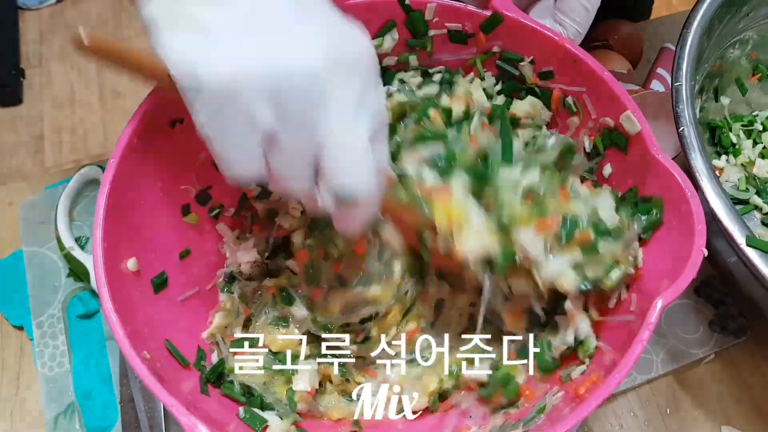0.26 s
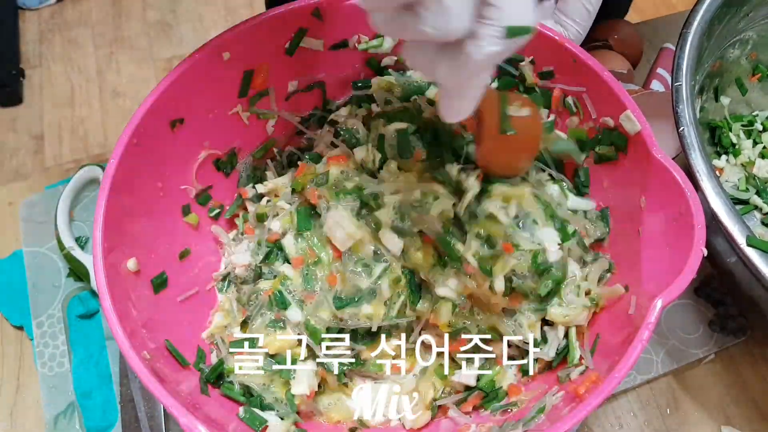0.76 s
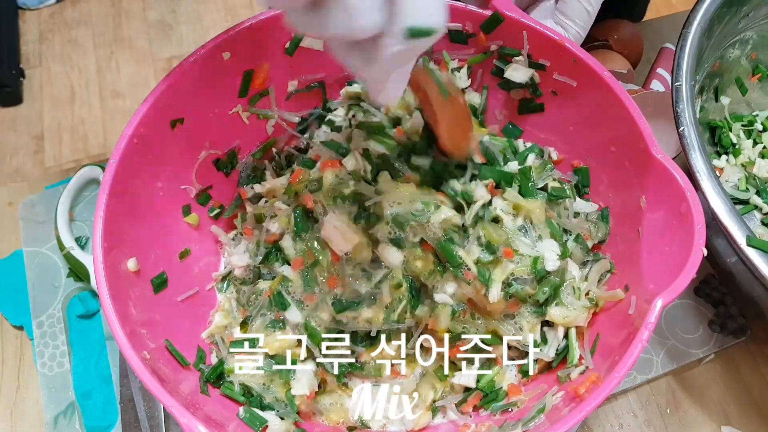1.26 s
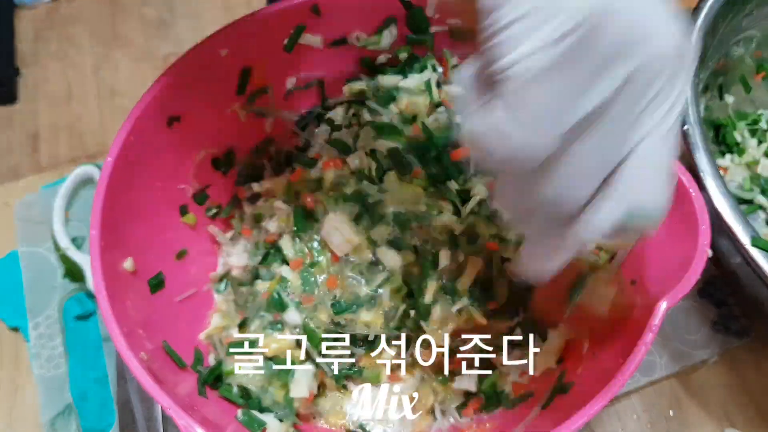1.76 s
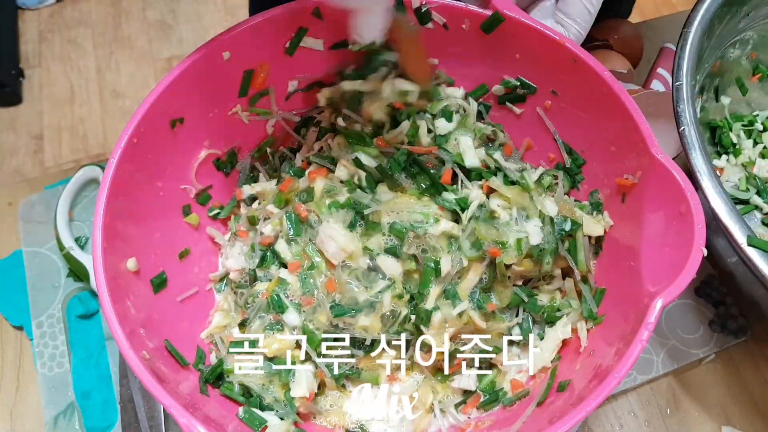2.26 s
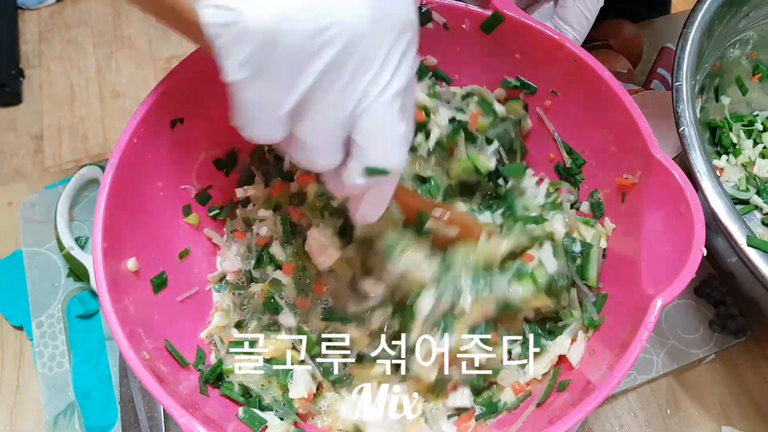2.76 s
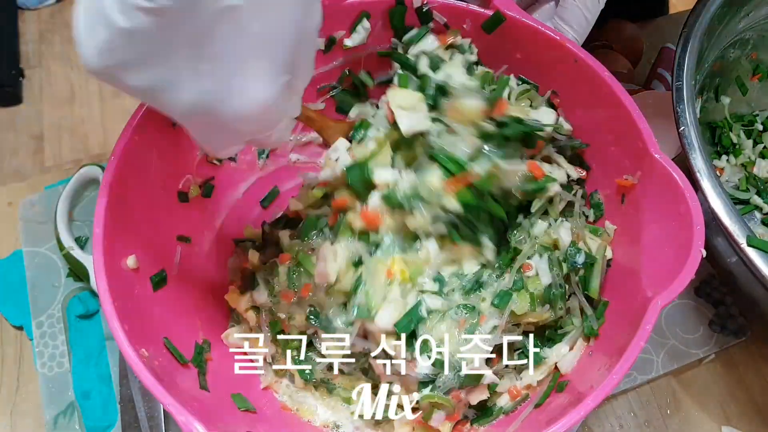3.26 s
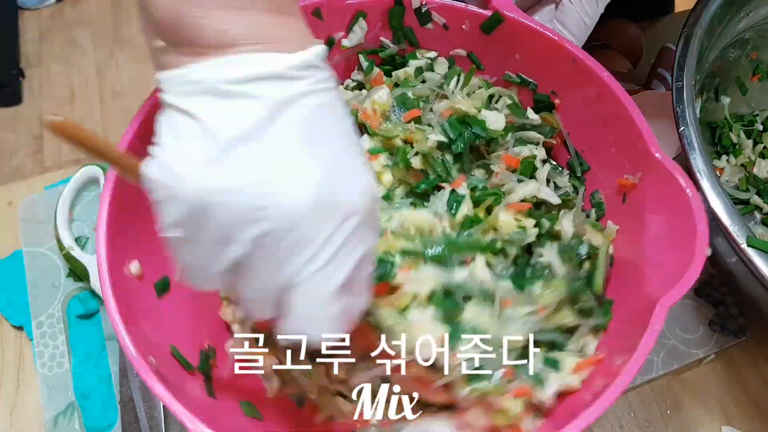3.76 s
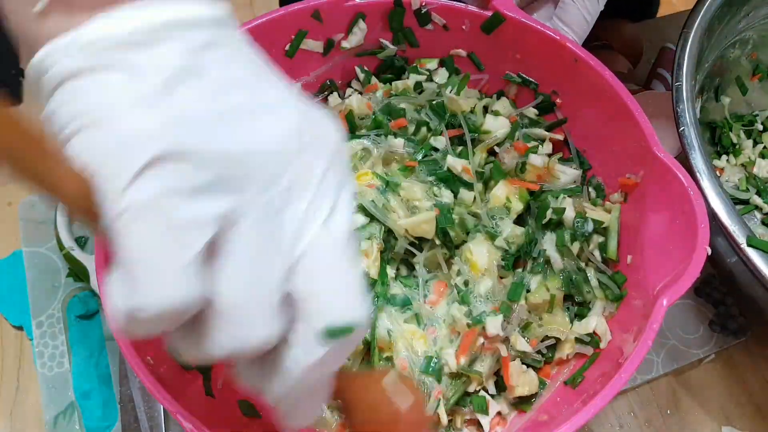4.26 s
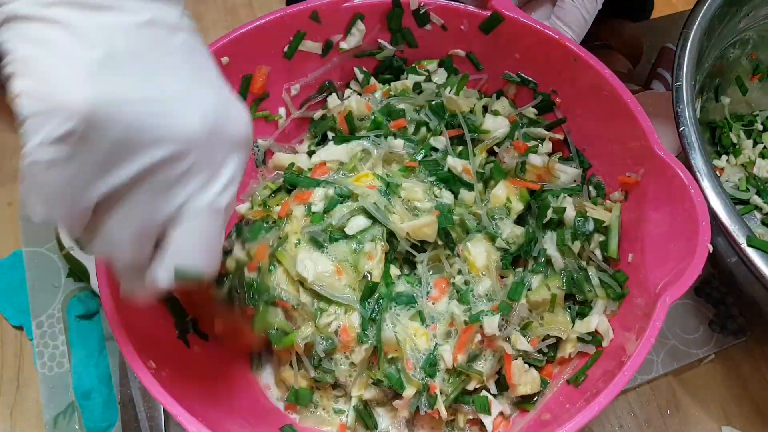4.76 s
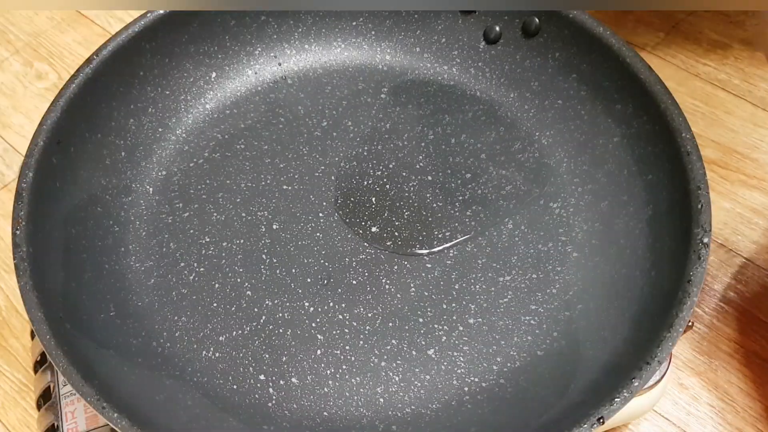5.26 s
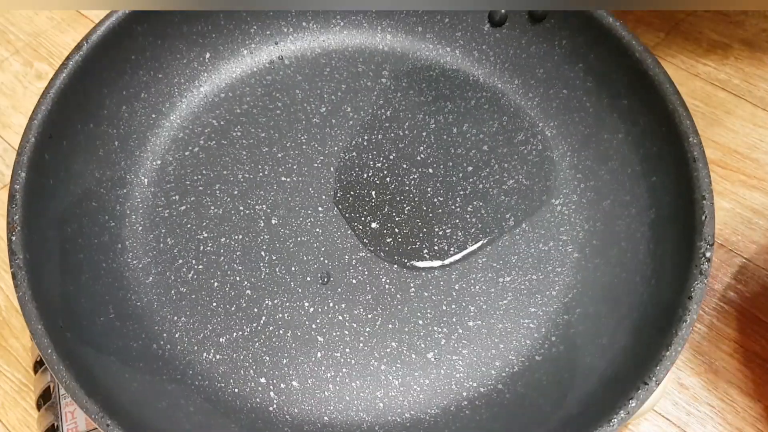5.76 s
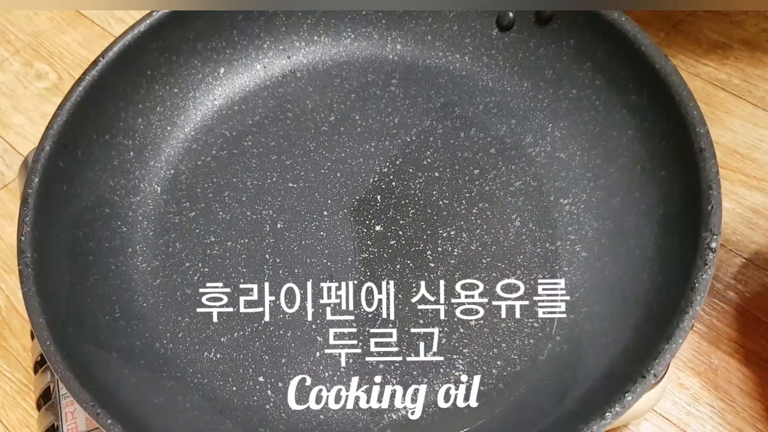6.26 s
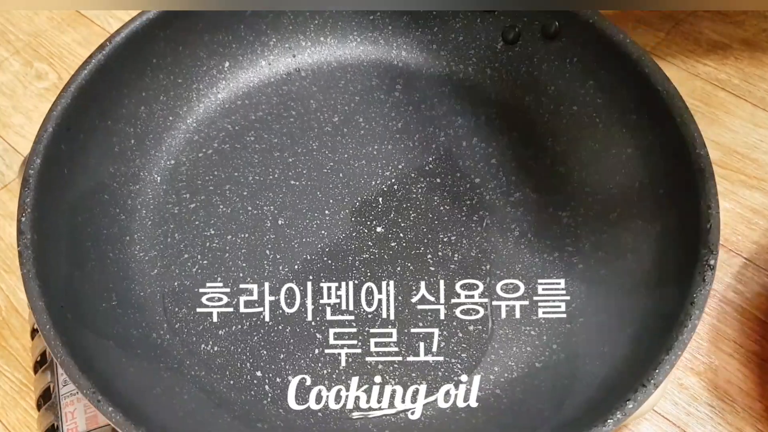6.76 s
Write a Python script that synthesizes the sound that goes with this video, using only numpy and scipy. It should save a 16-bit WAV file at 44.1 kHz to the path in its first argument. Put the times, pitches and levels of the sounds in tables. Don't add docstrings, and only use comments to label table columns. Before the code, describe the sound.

Irregular strokes of a spoon through sticky, chunky batter, with bubbles popping and dull plastic knocks on the bowl wall, heard by a close stereo microphone in a fairly dry room with low rumble. Then a sudden change of scene: steady low flame noise with thin gas hiss and faint jet whistles, and a metal pan shifting with light taps, then a cluster of sharper clanks.

```python
import sys
import numpy as np
from scipy import signal
from scipy.fft import rfft, irfft, next_fast_len
from scipy.io import wavfile
from scipy.ndimage import uniform_filter1d

SR = 44100
rng = np.random.default_rng(int(sys.argv[2]) if len(sys.argv) > 2 else 0)


def invert_db(level):
    return 10 ** (np.asarray(level, dtype=float) / 20)


def dump_mix(stems):
    frames = np.atleast_2d(stems).T
    limited = np.clip(frames, -1, 1)
    pcm = np.round(limited * 32767).astype(np.int16)
    wavfile.write(sys.argv[1], SR, pcm)


N = 309700


def evened(x):
    return x / np.sqrt(np.mean(x ** 2) + 1e-20)


def peaked(x):
    return x / abs(x).max()


def read(points, hz):
    f, value = np.transpose(points)
    return np.interp(np.log(hz + 1), np.log(f + 1), value)


def along(rows):
    s, *columns = np.transpose(rows)
    return [invert_db(np.interp(np.arange(N) / SR, s, c)) for c in columns]


def add(mix, s, sound):
    part = mix[..., round(s * SR):][..., :sound.shape[-1]]
    part += sound[..., :part.shape[-1]]


def band(x, lo_hz, hi_hz):
    return signal.sosfilt(signal.butter(2, [lo_hz, hi_hz], "band", fs=SR, output="sos"), x)


def coloured(x, spectrum):
    size = next_fast_len(N)
    gain = invert_db(read(spectrum, np.fft.rfftfreq(size, 1 / SR)))
    return evened(irfft(rfft(x, size) * gain, size)[..., :N])


# [f/Hz, likeness]
LIKENESS = [(60, 0.95), (180, 0.96), (550, 0.73), (1650, 0.027), (4970, 0.03), (15000, 0.057)]


def pair_noise(patchy_db):
    frames, hz = N // 128 + 5, np.fft.rfftfreq(512, 1 / SR)
    a, b, c, d, patches = rng.standard_normal((frames, 257, 5)).T
    patches = evened(uniform_filter1d(uniform_filter1d(patches, 6, 0), 16, 1))
    same = np.clip(read(LIKENESS, hz), -1, 1)[:, None]
    left = a + 1j * b
    right = same * left + np.sqrt(1 - same ** 2) * (c + 1j * d)
    z = np.array([left, right]) * invert_db(patchy_db * patches)
    return signal.istft(z, nperseg=512, noverlap=384)[1][:, :N]


def flickering(depth_db, quick_s):
    jumps = evened(uniform_filter1d(rng.standard_normal(N), round(quick_s * SR)))
    return evened(pair_noise(1.0) * invert_db(depth_db * jumps))


def whistle(hz, width):
    peak = [(hz - 2 * width, -40), (hz - width / 2, -6), (hz, 0), (hz + width / 2, -6), (hz + 2 * width, -40)]
    return coloured(pair_noise(0), peak)


def grains(per_s, spread_db, lo_hz, hi_hz, cycles):
    size = invert_db(spread_db * np.minimum(rng.exponential(1, N), 5)) * (rng.random(N) < per_s / SR)
    kind, out = rng.integers(0, 16, N), np.zeros((2, N))
    for k, hz in enumerate(np.geomspace(lo_hz, hi_hz, num=16)):
        turns = np.arange(400) * hz / SR
        grain = np.sin(2 * np.pi * turns * (1 + 0.04 * turns)) * np.exp(-2 * turns / cycles) * np.sqrt(hz)
        side_db = 3 * (-1) ** k
        out += invert_db([[side_db], [-side_db]]) * signal.oaconvolve(size * (kind == k), grain)[:N]
    return evened(out)


def leaning(hz, middle_hz, db_per_octave):
    return invert_db(db_per_octave * np.log2(hz / middle_hz) * np.array([[.5], [-.5]]))


def burner_share():
    return np.clip((np.arange(N) / SR - CUT_S) / 0.004, 0, 1)


CUT_S = 4.93

STEEPNESS = (1.0, 1.07, 1.44)


def strokes(rows, rise_share):
    s, fade, *levels = np.transpose(rows)
    t = np.arange(0, N + 64, 64) / SR
    late = (t[:, None] - s) / np.maximum(fade, .01)
    down_db = -20 * np.maximum(late, -late / rise_share)
    powers = [(invert_db(db + steep * down_db) ** 2).sum(axis=1) for db, steep in zip(levels, STEEPNESS)]
    return np.array([np.interp(np.arange(N) / SR, t, power) for power in powers])


# [t/s, time to fade 20 dB/s, drag level/dB, wet crackle level/dB, finest spray level/dB]
SLOPS = [(0.0, 0.17, -49.5, -55.5, -78), (0.735, 1.02, -56.5, -60.5, -66), (0.98, 0.52, -51.5, -65, -60),
         (1.2, 0.06, -58.5, -41, -46), (1.51, 0.25, -49, -55, -55), (1.79, 0.56, -53, -63, -70),
         (2.035, 0.16, -53, -53.5, -76), (2.27, 0.24, -48.5, -60, -57), (3.035, 0.44, -55, -56, -54.5),
         (3.145, 0.4, -47.5, -75, -62.5), (3.765, .3, -63.5, -63, -86), (4.385, 0.14, -65, -57.5, -58.5),
         (4.61, 0.3, -71, -75, -59), (4.775, 0.13, -40.5, -42.5, -45)]
SWEEPS = [(0.228, 0.26, -44, -54, -63), (0.558, 1, -60.5, -69, -91), (0.885, -1.4, -67, -60, -80),
          (0.965, -0.52, -52, -46, -64), (1.09, -0.4, -67, -57, -68), (1.254, 0.04, -45, -47, -60),
          (1.6, 0.16, -54.5, -54, -65), (1.871, 0.1, -49.5, -72, -47), (1.922, 0.02, -61, -50, -57),
          (2.02, 0.04, -57, -54, -63), (2.141, -0.19, -55, -71, -52), (2.308, 0, -48, -49, -54),
          (2.612, 0.19, -52, -58, -85), (2.83, 0.27, -55.5, -60, -69), (3.09, 0.15, -54, -60, -70),
          (3.3, -1.8, -64.5, -80, -88), (3.57, 0.17, -52, -62, -73), (3.831, 0.39, -50, -62, -65.5),
          (3.887, 0.0056, -39.5, -72, -76), (4.05, 0.52, -56.5, -63.5, -72), (4.456, 0.06, -47, -49, -51),
          (4.67, 0.09, -49, -57, -50), (4.882, 0.1, -52, -54, -58)]
# [f/Hz, level/dB]
DRAG = [(180, -56.5), (300, -6), (492, -6), (708, -3.5), (1600, -7.5), (2330, -7), (5000, -25.5),
        (6500, -74.5)]
CRACKLE = [(1500, -35), (2600, 2.5), (3500, 1), (4700, -3.5), (6300, -4), (7700, -4), (8700, -15.5),
           (11000, -23)]
SPRAY = [(5000, -17.5), (8000, 14.5), (9300, -2), (11000, 8), (13000, 8.5), (15500, 9.5)]


def stirring():
    drag, crackle, spray = np.sqrt(strokes(SLOPS, 0.046) + strokes(SWEEPS, 0.47))
    dragging = coloured(.6 * grains(2000, 2.8, 600, 3500, 5.) + flickering(2.5, .012), DRAG)
    wet = 0.2 * grains(3000, 3.9, 2330, 13300, 1.9) + flickering(4.5, 0.0046)
    layers = drag * dragging + crackle * coloured(wet, CRACKLE) + spray * coloured(wet, SPRAY)
    return invert_db(-0.5) * layers * (1 - burner_share())


# [t/s, peak level/dB, pitch f/Hz, spray level/dB]
POPS = [(0.04, -34.5, 2160, -14), (0.215, -39.5, 2700, -7), (0.233, -33.5, 1240, -11),
        (0.234, -35.5, 3250, -12), (0.262, -39, 2280, -25), (0.263, -39, 1130, -30),
        (0.315, -35.5, 1264, -25), (0.331, -45, 2850, -20), (0.374, -43, 690, -27), (0.467, -51, 2000, -19),
        (0.507, -50, 3130, -18), (0.547, -44.5, 3150, -14), (1.069, -43, 2260, -5),
        (1.243, -42.5, 740, 4.5), (1.5154, -33.5, 2030, -13), (1.542, -35, 2160, -18),
        (1.566, -40, 965, -1.5), (1.603, -38, 2600, -5), (1.848, -41, 1040, -25), (1.902, -38, 1050, -25),
        (1.91, -39, 1730, -11), (2.048, -39, 2000, -20), (2.1075, -45, 1940, -13), (2.304, -33.5, 1040, -9),
        (3.153, -37, 2310, -5), (3.177, -32.5, 1840, -15), (3.22, -33.5, 1760, -16),
        (3.23, -33.5, 1800, -15), (3.358, -38, 833, -49), (3.763, -37, 2360, -22), (3.776, -43, 2500, -25),
        (3.792, -37, 1395, -25), (3.819, -35, 746, -12), (3.878, -32, 1910, -30), (3.884, -29, 1776, -31.5),
        (3.89, -38, 800, -30), (3.94, -42.5, 2400, -15), (3.978, -39.5, 1310, -17), (4.031, -42, 2240, -28),
        (4.049, -58, 659, 10), (4.082, -50, 2150, -23), (4.118, -52, 3000, -2), (4.158, -47, 1800, -15),
        (4.169, -39.5, 1730, -25), (4.442, -41, 920, -3), (4.457, -32, 2490, -14),
        (4.468, -36.5, 2170, -18), (4.631, -29, 1035, -14), (4.885, -49, 872, -4)]
MORE_POPS = [(0.84, -49, 1990, 0), (0.885, -54, 2000, 3), (1.564, -41, 2200, -15), (1.568, -40, 3100, -20),
             (1.579, -45, 2310, -30), (1.586, -43, 2300, -30), (1.6327, -43, 1190, -16), (1.649, -46, 3600, -11),
             (2.129, -46, 1500, -20), (2.314, -41, 3300, -10), (3.3, -46.5, 872, -25), (3.375, -48.5, 2800, -15),
             (3.393, -48, 1800, -25), (3.493, -41, 1080, -14), (3.558, -47, 766, -24.5), (3.578, -41, 985, -20),
             (3.695, -50, 2850, -8), (3.788, -54, 6500, -2)]


def pops():
    out, t = np.zeros((2, N)), np.arange(1600) / SR
    for s, db, hz, spray_db in POPS + MORE_POPS:
        noise = rng.standard_normal((3, len(t)))
        fade = np.minimum(t / 0.0011, 1) * (invert_db(-60 * t / 0.013) + invert_db(-13 - 60 * t / 0.13))
        ragged = evened(band(noise[0] + .6 * noise[1:], hz * .72, hz * 1.35))
        bubble = .7 * np.sin(2 * np.pi * hz * t) + .45 * ragged
        spray = evened(band(noise[1:], 2700, 16000))
        place = leaning(hz, 1100, 1.5)
        add(out, s, invert_db(db) * fade * (bubble + invert_db(spray_db) * spray) * place)
    return out


# [t/s, peak level/dB, low wall mode f/Hz, high wall mode f/Hz, high mode level/dB]
KNOCKS = [(0.711, -33, 810, 2290, -20), (0.7241, -28.5, 1370, 3200, -5), (0.7264, -25, 1056, 2150, -2.5),
          (0.7303, -33, 1060, 3220, -5), (0.729, -27.5, 1430, 1790, -2.5), (0.9758, -19.5, 947, 2330, -6.5),
          (0.9763, -26, 576, 1880, -2), (0.978, -23, 1150, 1530, -5), (0.984, -29, 846, 2050, -10),
          (1.1895, -11, 1005, 1544, -11), (1.1914, -10, 1008, 2310, -18), (1.19, -25, 302, 1350, 1),
          (1.198, -23.5, 850, 1700, -17), (1.508, -32.5, 780, 1600, -14), (1.786, -23, 876, 1720, -7),
          (1.794, -27, 940, 2100, -14.5), (1.864, -30, 914, 2010, -12), (1.931, -29, 1006, 1644, -3.5),
          (1.94, -40, 980, 2600, -1), (2.03, -25, 787, 1750, -7.5), (2.0305, -35.5, 1300, 2710, -3),
          (2.261, -10, 1100, 1557, -15), (2.263, -17, 946, 1920, -9), (2.2616, -24.5, 597, 3120, -5.5),
          (3.027, -14, 937, 1516, -11.5), (3.028, -22, 758, 2420, -16), (3.106, -35.5, 705, 1470, -27),
          (4.3735, -13.5, 890, 1490, -20), (4.375, -26.5, 1170, 1743, 1), (4.382, -31, 825, 1770, -10),
          (4.438, -38, 1000, 1490, -7.5), (4.599, -16, 1100, 1770, -4), (4.605, -19, 868, 1820, -10),
          (4.676, -26.5, 840, 2130, -5), (4.77, -15.5, 952, 1470, -11), (4.7706, -25, 1180, 2290, -2.5)]


def knocks():
    rim_hz = 2397
    out, t = np.zeros((2, N)), np.arange(4000) / SR
    blow = (t / 0.0014) ** 1.6 * np.exp(1.5 - 1.483 * t / .0012)
    ring = (1 - np.exp(-t / .002)) * invert_db(-13 - 60 * t / 0.049)
    weak = (1 - np.exp(-t / 0.0013)) * invert_db(-16 - 60 * t / 0.079)
    thud = np.sin(2 * np.pi * 300 * t) * invert_db(-20.0 - 60 * t / 0.024)
    for (s, db, low_hz, high_hz, high_db), (u, v) in zip(KNOCKS, rng.random((len(KNOCKS), 2))):
        noise = rng.standard_normal((2, len(t)))
        noise = noise + 0.1 * noise[::-1]
        low = np.sin(2 * np.pi * low_hz * t) * blow + ring * np.sin(2 * np.pi * (low_hz * .9 * t + u))
        low = low + weak * evened(band(noise, low_hz * 0.65, low_hz * 1.37))
        high = np.sin(2 * np.pi * high_hz * t) * blow + ring * np.sin(2 * np.pi * (high_hz * t + v))
        high = high + 0.9 * weak * evened(band(noise, high_hz * 1.04, high_hz * 1.39))
        high = high + 0.17 * np.sin(2 * np.pi * (rim_hz * t + u)) * (blow + ring)
        place = leaning(low_hz, 855, 1.5)
        add(out, s, invert_db(db + 0.5) * (low + invert_db(high_db + 4.5) * high + thud) * place)
    return out


# [t/s, clack level/dB, tick level above the clack/dB]
EDGES = [(0.7255, -27, 3), (0.7292, -25.5, -0.5), (0.977, -22.5, -15), (1.1895, -19.5, -5.5),
         (1.8635, -39.5, 0.5), (1.93, -33.5, -25), (2.0303, -30.5, -19), (2.2603, -18.5, -11.5),
         (3.0265, -42, 9), (3.14, -27.5, -7), (4.3728, -29.5, -43), (4.4373, -42.5, 9), (4.5975, -35, -34),
         (4.6707, -33, -24), (4.6747, -31, -10), (4.7694, -23, -23), (6.6612, -36, -3), (6.6665, -32, 9.5),
         (6.694, -36, -4)]


def edges():
    out, t = np.zeros((2, N)), np.arange(4000) / SR
    for s, clack_db, tick_db in EDGES:
        noise = rng.standard_normal((2, len(t)))
        noise = noise + 0.068 * noise[::-1]
        clack = evened(band(noise, 680, 5230)) * (invert_db(-60 * t / 0.015) + invert_db(-14.5 - 60 * t / 0.07))
        tick = evened(band(noise, 3800, 12700)) * (invert_db(-60 * t / 0.0054) + invert_db(-28.0 - 60 * t / 0.13))
        onset = np.minimum(t / 0.00028, 1)
        add(out, s, invert_db(clack_db - 5.0) * onset * (clack + invert_db(tick_db + 8.5) * tick))
    return out


# [t/s, level/dB]
SKID = [
    (3.112, -83),
    (3.122, -45),
    (3.137, -57),
    (3.142, -38.5),
    (3.165, -48.5),
    (3.23, -55.5),
    (3.29, -83),
]
# [low f/Hz, high f/Hz, level/dB]
SKID_BANDS = [(2150, 2510, -4.5), (3900, 5650, 0)]


def skid():
    level, = along(SKID)
    slips = 0.41 * grains(1484, 3.2, 2300, 6600, 1.0) + flickering(3.9, 0.0028)
    return level * sum(invert_db(db) * evened(band(slips, lo_hz, hi_hz)) for lo_hz, hi_hz, db in SKID_BANDS)


# [t/s, peak level/dB, upper mode level/dB, rattle level/dB, handle mode level/dB]
CLANKS = [(5.471, -46.5, -27, -19, -14), (5.634, -29, -7.5, -27, 0.5), (5.915, -34, -19.5, -43, -9),
          (6.118, -35.5, -16, -34, -6), (6.486, -21, -12, -35, -3), (6.515, -35.5, -15, -41, -7.5),
          (6.662, -14.5, -7.5, -15, 6), (6.667, -20.5, -19, -19, -6), (6.695, -22, -14, -19.5, -3),
          (6.702, -23.5, -18, -24, -4), (6.749, -21.5, -13.5, -33, 3), (6.761, -27.5, -20, -34, -13)]
# [f/Hz, level/dB, t60/s]
PAN = [(534.3, -1.5, 0.19), (572, -7, 0.063), (712, -5, 0.074), (890, -7.5, 0.073), (1180, -1, 0.047),
       (1307, -6, 0.043), (1636, -7, 0.15), (1737, -3.5, 0.077), (2150, -8, 0.031), (2360, -10.5, 0.042),
       (2634, -15, 0.11), (3740, -9, 0.066), (4414, 1, 0.033), (8500, -18, 0.033)]
# [level/dB, t60/s]
PAN_SING = (-59.5, 2.7)


def mode_lift(hz, upper_db, rattle_db, handle_db):
    if hz < 800:
        return 0
    if hz < 1400 or 1900 < hz < 2500:
        return handle_db
    return upper_db + 11.0 if hz < 3200 else rattle_db + 14.0


def clanks():
    out, t = np.zeros((2, N)), np.arange(9000) / SR
    choke = invert_db(-5 * np.clip((t - 0.037) / .006, 0, 1))
    for s, db, upper_db, rattle_db, handle_db in CLANKS:
        turn = rng.random((len(PAN), 1)) + 0.046 * rng.standard_normal((len(PAN), 2))
        wobble = evened(uniform_filter1d(rng.standard_normal((len(PAN), len(t))), size=350))
        body = np.zeros((2, len(t)))
        for (hz, mode_db, t60), u, w in zip(PAN, turn, wobble):
            lift_db = mode_lift(hz, upper_db, rattle_db, handle_db)
            level = invert_db(mode_db + lift_db - 60 * t / t60 + 2.5 * w)
            body += level * np.sin(2 * np.pi * (hz * t + u[:, None]))
        contacts = rng.standard_normal(800) * (rng.random(800) < .03) * np.exp(-np.arange(800) / 160.0) * 0.5
        contacts[0] = 1
        ringing = peaked(signal.oaconvolve(body, contacts[None], axes=1)[:, :len(t)])
        noise = rng.standard_normal((2, len(t)))
        chatter = 0.34 + (uniform_filter1d(rng.standard_normal(len(t)), size=150) > 0)
        crash = evened(band(noise + .5 * noise[::-1], 410, 2770)) * chatter
        crash = crash * invert_db(upper_db - 12 - 60 * t / 0.24)
        rattle_fade = invert_db(rattle_db - 60 * t / 0.16) + invert_db(rattle_db + 1 - 60 * t / 0.017)
        rattle = evened(band(noise, 2940, 9000)) * rattle_fade
        struck = choke * ringing + crash + rattle
        add(out, s, invert_db(db) * band(struck * np.minimum(t / 0.00069, 1), 420, 9900))
    sing_db, sing_t60 = PAN_SING
    t = np.arange(SR) / SR
    waver = evened(uniform_filter1d(rng.standard_normal((2, SR)), size=1500))
    level = invert_db(sing_db - 60 * t / sing_t60 + 3.0 * waver[0])
    singing = level * np.sin(2 * np.pi * 1165 * t + .5 * waver[1])
    add(out, CLANKS[6][0], singing[None])
    return out


# [f/Hz, level/dB]
ROAR = [(20, -32), (45, -13.5), (120, -4), (168, -1), (210, -8.5), (300, -13), (800, -25), (1700, -53)]
GAS = [(530, -55), (900, -1), (1660, -2.5), (5550, -11.5), (7960, -9.5), (9420, -23), (10500, -20),
       (16000, -15.5)]
# [f/Hz, width/Hz, level/dB]
JETS = [(4345, 200, -79), (4890, 170, -71), (6900, 120, -78), (8140, 160, -74), (10520, 700, -70.5)]


def burner():
    jets = np.zeros((2, N))
    for hz, width, db in JETS:
        waver = evened(uniform_filter1d(rng.standard_normal(N), size=5000))
        jets += invert_db(db + 1.8 * waver) * whistle(hz, width)
    hiss = invert_db(-61.5) * coloured(pair_noise(0.91), GAS)
    roar = invert_db(-47.5 + 2.5) * coloured(pair_noise(0.58), ROAR)
    return burner_share() * (roar + hiss + jets)


# [t/s, level/dB]
KITCHEN = [
    (0.0, -52),
    (0.15, -51),
    (1.27, -52),
    (3.6, -54),
    (3.71, -63),
    (3.82, -56.5),
    (4.2, -57.5),
    (4.43, -59.5),
    (4.9, -57.5),
]
# [f/Hz, level/dB]
RUMBLE = [(20, -13.5), (57, 4.5), (75, -2), (120, -2.5), (230, -1.5), (320, -8), (900, -14), (1500, -46)]
HISS = [(290, -37), (500, -5), (729, -18), (1360, -8), (5240, -18.5), (9630, -28.5), (15100, -20.5),
        (16000, -34)]


def kitchen():
    rumble, = along(KITCHEN)
    t = np.arange(N) / SR
    swelling_db = -58 + 4 * np.cos(2 * np.pi * (t - .1) / 3)
    hum = uniform_filter1d(invert_db(np.where(t < 3.65, swelling_db, -74.5)), size=4000)
    mains = invert_db(-3.0) * hum * np.sin(2 * np.pi * (58.2 * t + 0.17 * np.sin(2 * np.pi * 1.0 * t)))
    fan = rumble / np.median(rumble[t < CUT_S]) * invert_db(-66.5) * whistle(250.5, 8.1)
    air = invert_db(-1.56) * rumble * coloured(pair_noise(1.0), RUMBLE)
    hiss = invert_db(-69) * coloured(pair_noise(0.27), HISS)
    return (1 - burner_share()) * (mains + fan + air + hiss)


# [f/Hz, t60/s]
ROOM = [(200, 0.092), (1000, 0.14), (4000, 0.35), (12000, 0.022)]


def room(x):
    taps = np.zeros((2, SR // 2))
    at = np.arange(200, SR // 2 - 20, 20) + rng.integers(0, 20, (2, (SR // 2 - 201) // 20))
    np.put_along_axis(taps, at, rng.choice([-1., 1.], at.shape), 1)
    hz, t, z = signal.stft(taps, SR, nperseg=256)
    tail = signal.istft(z * invert_db(-60 * t / read(ROOM, hz)[:, None]), SR, nperseg=256)[1]
    return signal.fftconvolve(x[None], tail / np.linalg.norm(tail[0]), axes=1)[:, :N]


# [f/Hz, phase/rad]
LEAD = [(0, -2), (690, 0.34), (3100, 1.39), (4390, 8), (6120, 2), (9390, 20.5), (14800, 10.5), (16400, 42)]
# [f/Hz, level/dB]
LEAN = [(60, -2.5), (180, 1), (550, 1), (1650, -1), (4970, -2.5), (15000, 2)]


def ports(x):
    size = next_fast_len(N)
    hz = np.fft.rfftfreq(size, 1 / SR)
    half = np.exp(.5j * read(LEAD, hz)) * invert_db(read(LEAN, hz) / 2)
    return irfft(rfft(x * np.ones((2, 1)), size) * np.array([half, 1 / half]), size)[:, :N]


def scene():
    hits = knocks() + edges() + clanks()
    close = ports(hits + pops() + stirring() + skid())
    return close + invert_db(-16.0) * room(hits.mean(0)) + kitchen() + burner()


def low_pass(x):
    return signal.sosfilt(signal.butter(12, 16830, fs=SR, output="sos"), x)


# [f/Hz, level/dB]
EDGE = [(15600, 1), (15950, -20)]


def record(dry):
    size = next_fast_len(N)
    gain = invert_db(read(EDGE, np.fft.rfftfreq(size, 1 / SR)))
    edged = irfft(rfft(dry, size) * gain, size)[:, :N]
    return low_pass(edged)


dry = scene()
out = record(dry)
dump_mix(out)
```